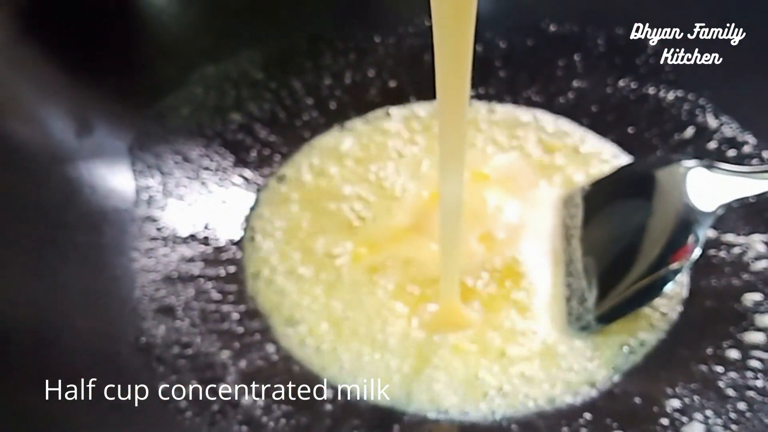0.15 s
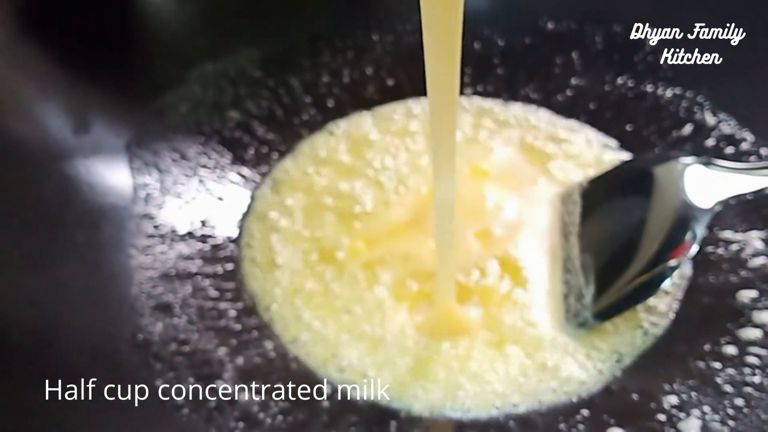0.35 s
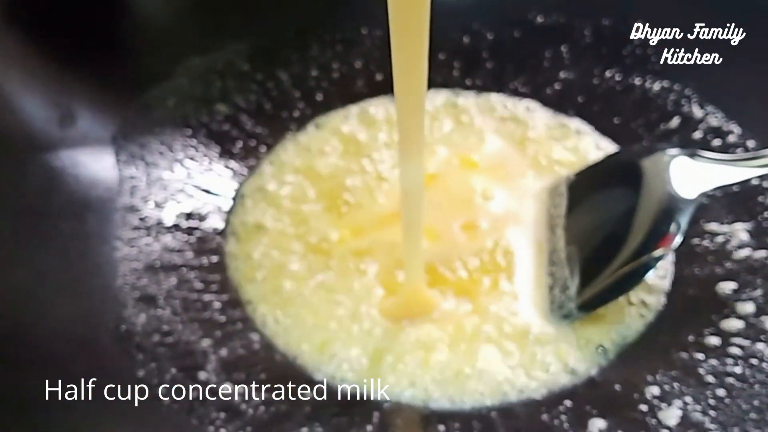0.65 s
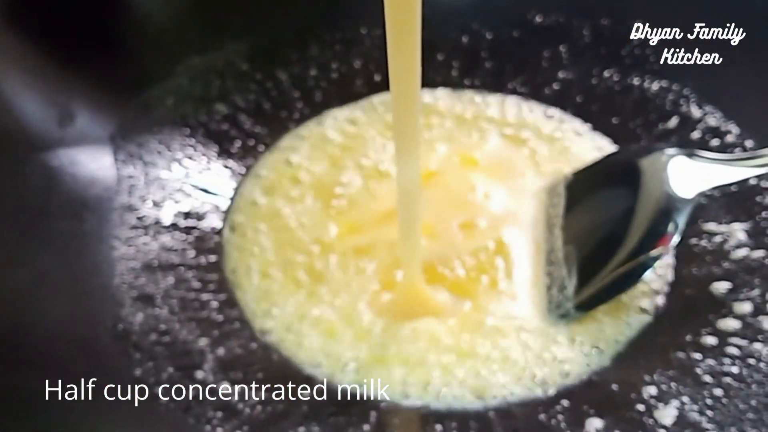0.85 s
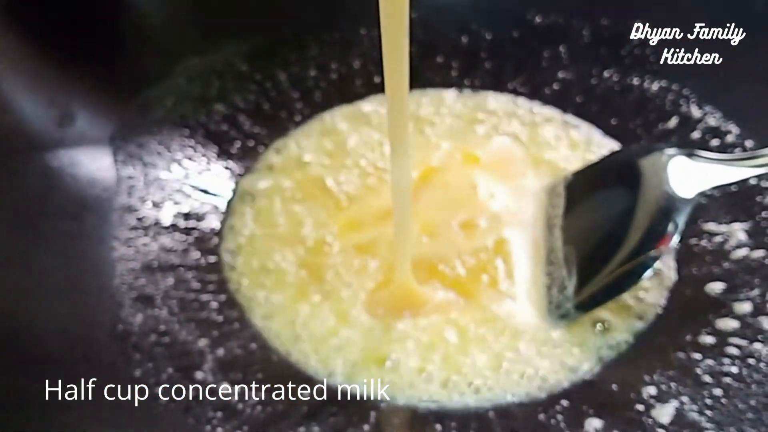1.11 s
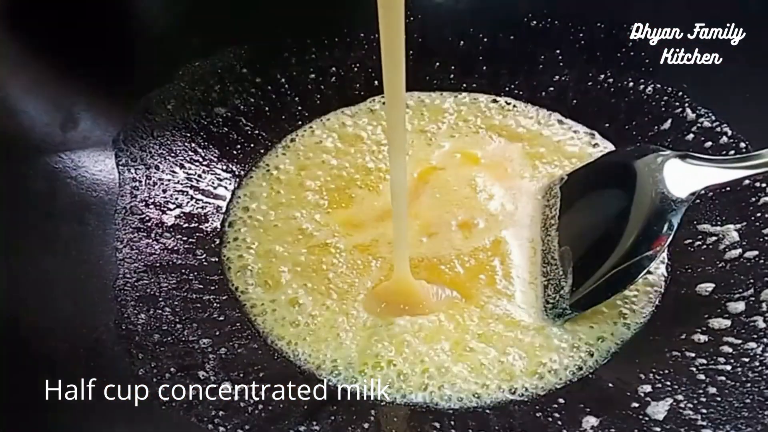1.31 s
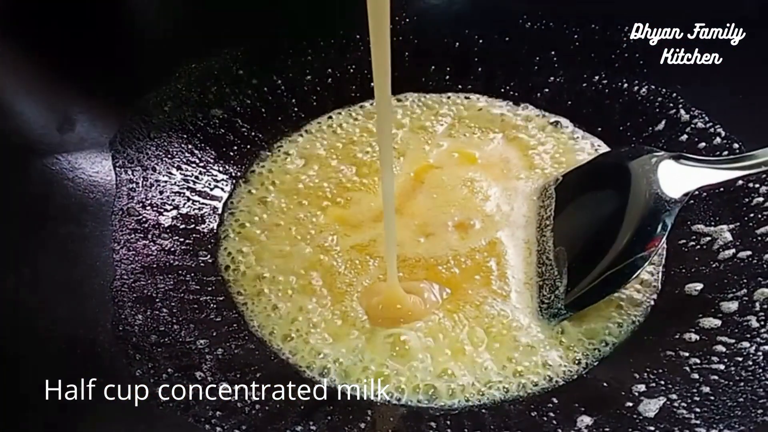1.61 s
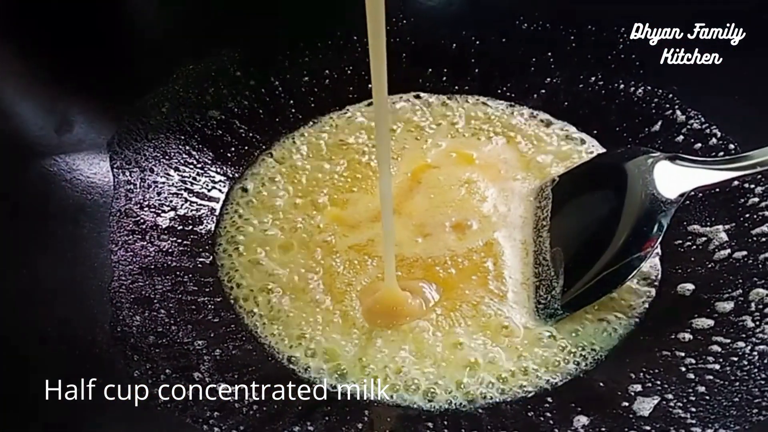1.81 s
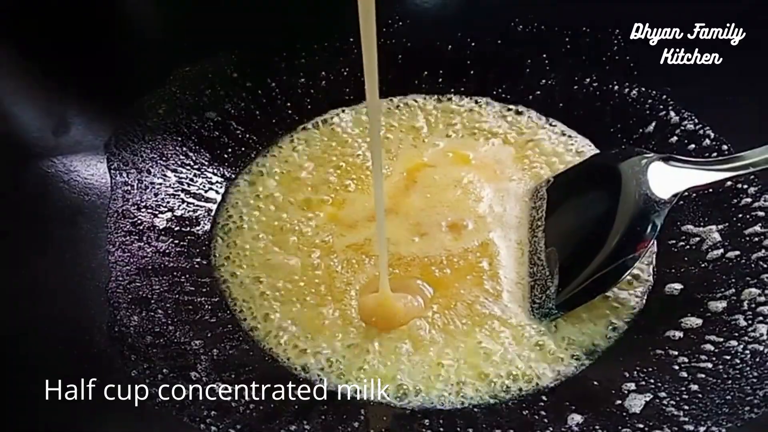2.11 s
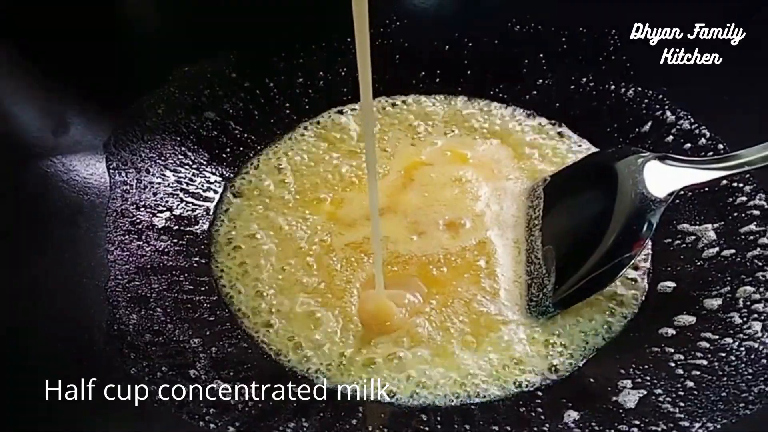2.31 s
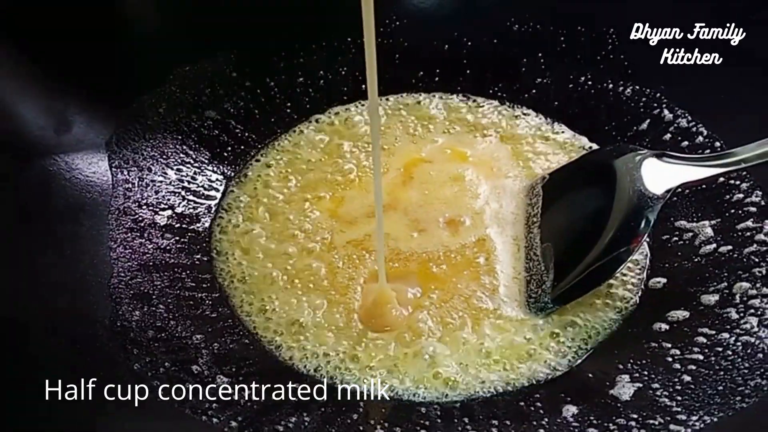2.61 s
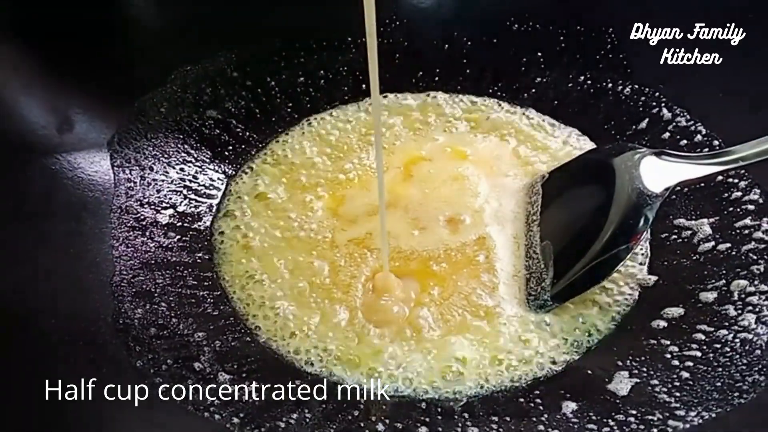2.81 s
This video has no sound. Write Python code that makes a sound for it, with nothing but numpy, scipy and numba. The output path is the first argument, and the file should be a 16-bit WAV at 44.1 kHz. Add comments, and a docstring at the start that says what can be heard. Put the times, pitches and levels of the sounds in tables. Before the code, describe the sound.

Butter sizzles and foams in a hot pan, close up in a small kitchen. It begins softer, with the fizz brightening after 0.3 s. Sharp spits snap on the left, clustering around 0.7-1.2 s, 1.65-1.7 s and 2.5 s. Foam sputters in short flurries over steady simmering; small bubbles plop near 0.7, 1.6 and 2.3-2.6 s. Two faint dull bumps come around 0.5 s, above a very quiet low bed.

```python
"""Butter foams in a hot pan close by, in a small kitchen: thousands of short random tones are its bubbles.
Tiny steam bubbles fizz and droplets spit on the left, while foam sputters steadily and in flurries.
Larger bubbles simmer below, and the largest plop, each as a tone that swells and dies away.
Faint, patchy low tones and soft hiss, a few clearer low tones and two soft bumps lie underneath."""
import sys
import numpy as np
from scipy import signal
from scipy.fft import rfft, irfft
from scipy.io import wavfile
from scipy.ndimage import uniform_filter1d
from numba import njit

SR = 44100
rng = np.random.default_rng(int(sys.argv[2]) if len(sys.argv) > 2 else 0)


def transcribe(u):
    """Save the signal u as a 16-bit wav file named by the first command-line argument.

    u: samples, shape (n,) or (channels, n), limited to [-1, 1]; the rate is SR.
    q: integer samples, one column per channel.
    """
    v = np.clip(np.atleast_2d(u).T, -1, 1)
    q = np.round(v * 32767).astype(np.int16)
    wavfile.write(sys.argv[1], SR, q)


N = 130095
TIME_S = np.arange(N) / SR


def undb(db):
    """Turn decibels into a plain gain."""
    return 10 ** (np.asarray(db) / 20)


def unit(x):
    """Scale to an average strength (rms) of 1."""
    return x / np.sqrt(np.mean(x ** 2))


def curve(rows):
    """Draw a gain over time through (time [s], level [dB]) rows."""
    return undb(np.interp(TIME_S, *np.array(rows).T))


def walk(rate_hz):
    """Wander slowly at random, with a spread near 1: held random steps, smoothed twice."""
    step = max(int(SR / rate_hz), 2)
    held = np.repeat(rng.standard_normal(N // step + 1), step)
    smooth = uniform_filter1d(uniform_filter1d(held, step), step)
    return 1.35 * smooth[:N]


def colour(x, rows):
    """Make each pitch range louder or softer by (pitch [Hz], left [dB], right [dB]) rows."""
    hz, left, right = np.array(rows).T
    log_hz = np.log(np.fft.rfftfreq(2 * N, 1 / SR) + 1)
    gains = undb([np.interp(log_hz, np.log(hz), side) for side in (left, right)])
    return irfft(rfft(x, 2 * N) * gains)[:, :N]


@njit
def bubbles(times, sizes, pitches, rings):
    """Each bubble is a short tone whose envelope swells to its size in its ring time and dies away."""
    out = np.zeros(N)
    for k in range(len(times)):
        first = max(int(times[k] * SR) + 1, 0)
        last = min(int((times[k] + 9 * rings[k]) * SR), N)
        for i in range(first, last):
            age = i / SR - times[k]
            envelope = age / rings[k] * np.exp(1 - age / rings[k])
            out[i] += sizes[k] * envelope * np.sin(2 * np.pi * pitches[k] * age)
    return out


def pops(rows, ring_s):
    """Play single short tones from (time [s], level [dB], pitch [Hz]) rows."""
    times, db, hz = np.array(rows, float).T.copy()
    return bubbles(times, undb(db), hz, np.full(len(hz), ring_s))


NEAR_DECAY_S, ROOM_T60_S, ROOM_LATE_DB = 0.012, 0.3, -16.5  # quick reflections; room tail


def kitchen(x, room_db):
    """Direct sound plus quick reflections from pan and hob and a short room tail, different at each ear."""
    t = np.arange(SR // 3) / SR
    near = np.exp(-t / NEAR_DECAY_S)
    late = undb(ROOM_LATE_DB - 60 * t / ROOM_T60_S)
    shape = (near + late) * (1 - np.exp(-t * 1000))  # eases in over about 1 ms
    response = rng.standard_normal((2, len(t))) * shape / np.sqrt(np.sum(shape ** 2))
    return x + undb(room_db) * signal.fftconvolve(x[None], response, axes=1)[:, :N]


BIGGEST = 5.32  # largest random tone, as a multiple of the spread in dB


def swarm(per_s, spread_db, ring_s, low_hz, high_hz, room_db, width_s=0, count=5):
    """Random short tones, many small and a few large, from several spots that differ in lag between ears."""
    out = 0
    draws = rng.random((int(per_s * N / SR / count), count, 4)).transpose(1, 2, 0)
    for (when, size, pitch, ring), place in zip(draws, np.linspace(-1, 1, count)):
        sizes = undb(spread_db * np.minimum(-np.log(1 - size), BIGGEST))
        pitches = low_hz + (high_hz - low_hz) * pitch
        rings = ring_s * 2 ** (ring - .5)  # shorter or longer by a factor of up to 1.41
        left, right = kitchen(bubbles(when * N / SR, sizes, pitches, rings), room_db)
        out = out + np.array([left, np.roll(right, round(place * width_s * SR))])
    return out


# strength of the fine fizz, before FIZZ_DB: (time [s], level [dB])
FIZZ_STRENGTH = [(0, -51.5), (.09, -50.5), (.16, -51.5), (.29, -54), (.34, -41), (.42, -47.5), (.52, -44),
                 (.68, -44.5), (.745, -45), (.79, -42), (1.1, -39.5), (1.17, -40.5), (1.22, -41),
                 (1.44, -44.5), (1.52, -39), (1.63, -43.5), (1.69, -40), (1.78, -39.5), (2.8, -40.5),
                 (2.95, -42.5)]
# colour of the fizz: (pitch [Hz], left [dB], right [dB])
FIZZ_TONE = [(1010, -18, -36), (3540, -6.5, -31), (4800, -8.5, -23), (5900, -1, -15.5), (7600, -14.5, -1),
             (8900, -14.5, -12.5), (10740, -0.5, -10.5), (13200, -0.5, -10), (15200, 3, -19)]
FIZZ_PER_S, FIZZ_SPREAD_DB, FIZZ_RING_S = 6000, 3.9, 0.00016
FIZZ_DB, FIZZ_ROOM_DB, FIZZ_WIDTH_S = 7, -2, .00005  # width: largest lag between the ears
SPLATTER_DB, SPLATTER_RISE_S, SPLATTER_FALL_S = -14, 0.0009, 0.01  # level is relative to the spit's row
RIGHT_FOLLOWS = 0.58  # share of the fizz's swings in dB that reaches the far, right ear


def fizz():
    """Tiny steam bubbles crackle in uneven waves; every spit throws a brief spray of them."""
    power = (curve(FIZZ_STRENGTH) * undb(FIZZ_DB + 1.93 * walk(70))) ** 2
    for start, db, _ in SPIT_EVENTS:
        rise, fall = (TIME_S - start) / SPLATTER_RISE_S, (start - TIME_S) / SPLATTER_FALL_S
        splatter = undb(db + SPLATTER_DB) * np.exp(np.minimum(rise, fall))
        power = power + splatter ** 2
    middle = np.median(power)
    right_power = middle * (power / middle) ** RIGHT_FOLLOWS
    grains = swarm(FIZZ_PER_S, FIZZ_SPREAD_DB, FIZZ_RING_S, 2810, 16450, FIZZ_ROOM_DB, FIZZ_WIDTH_S)
    return unit(colour(grains, FIZZ_TONE)) * np.sqrt([power, right_power])


# strength of the simmering, before SIMMER_DB: (time [s], level [dB])
SIMMER_STRENGTH = [(0, -52), (.08, -45.5), (.45, -48), (.6, -43.5), (.67, -47.5), (.77, -44), (.92, -49),
                   (1.0, -44), (1.23, -45), (1.44, -50.5), (1.51, -43), (1.56, -47), (1.69, -45),
                   (1.8, -45.5), (2.25, -45.5), (2.31, -44), (2.77, -42.5), (2.95, -46)]
# colour of the simmer: (pitch [Hz], left [dB], right [dB])
SIMMER_TONE = [(800, -67, -63), (1240, -34, -27), (1542, -8, -10.5), (1720, -3.5, -14), (2460, -0.5, -0.5),
               (3240, -1, 2.5), (3720, -6.5, -3.5), (4790, -3.5, -2), (7060, -21, -35), (12000, -35, -35)]
SIMMER_PER_S, SIMMER_SPREAD_DB, SIMMER_RING_S = 4500, 3.1, 0.00053
SIMMER_DB, SIMMER_ROOM_DB, SIMMER_WIDTH_S = 3.5, 4.5, .0003


def simmer():
    """Larger bubbles ring lower and longer."""
    grains = swarm(SIMMER_PER_S, SIMMER_SPREAD_DB, SIMMER_RING_S, 1284, 6060, SIMMER_ROOM_DB, SIMMER_WIDTH_S)
    strength = curve(SIMMER_STRENGTH) * undb(SIMMER_DB + 1.48 * walk(45.32))
    return unit(colour(grains, SIMMER_TONE)) * strength


# strength of the steady sputter under the flurries: (time [s], level [dB])
SPUTTER_STRENGTH = [(0, -40.5), (.1, -47), (.2, -44.5), (.55, -38.5), (.7, -38.5), (1.0, -40), (1.35, -38),
                    (1.41, -44), (1.5, -42), (1.63, -45), (1.72, -40.5), (2.12, -42), (2.21, -44),
                    (2.4, -40.5), (2.82, -40.5), (2.9, -39.5), (2.95, -37.5)]
# flurries of bursting foam, before FLURRY_DB: (time [s], length [s], level [dB])
FOAM_FLURRIES = [(0.081, 0.04, -35), (0.515, 0.014, -25.5), (0.59, 0.022, -31.5), (0.75, 0.02, -35),
                 (0.852, 0.011, -32), (0.903, 0.029, -28), (1.083, 0.047, -33.5), (1.206, 0.037, -31),
                 (1.285, 0.042, -31), (1.522, .025, -31), (1.596, 0.014, -28.5), (1.677, 0.021, -29),
                 (1.711, 0.025, -27.5), (1.765, 0.013, -30.5), (1.864, 0.025, -30.5), (1.905, 0.015, -27.5),
                 (1.95, 0.029, -32), (2.085, 0.03, -27), (2.152, 0.033, -31.5), (2.362, 0.049, -32),
                 (2.48, 0.064, -30.5), (2.63, 0.031, -36.5), (2.788, 0.039, -31.5)]
# colour of the sputter: (pitch [Hz], left [dB], right [dB])
SPUTTER_TONE = [(2890, -32, -16), (5560, -9, -16.5), (6660, -7.5, -8.5), (6900, -6, -6), (8000, -4, -4.5),
                (8700, -10.5, -7), (9090, -11.5, -10.5), (13900, -22.5, -42)]
SPUTTER_PER_S, SPUTTER_SPREAD_DB, SPUTTER_RING_S, SPUTTER_ROOM_DB = 4000, 2.72, 0.00035, -4
FLURRY_ATTACK_S, FLURRY_RELEASE_S, FLURRY_DB = 0.011, 0.0035, -6


def sputter():
    """Foam bursts steadily and in flurries that rise, hold and die away."""
    power = (curve(SPUTTER_STRENGTH) * undb(2.74 * walk(44.81))) ** 2
    for start, length, db in FOAM_FLURRIES:
        rise = np.clip((TIME_S - start) / FLURRY_ATTACK_S + .5, 0, 1)  # half risen at its start time
        fall = np.exp(-np.maximum(TIME_S - start - length, 0) / FLURRY_RELEASE_S)
        power = power + (undb(db + FLURRY_DB) * rise * fall) ** 2
    grains = swarm(SPUTTER_PER_S, SPUTTER_SPREAD_DB, SPUTTER_RING_S, 4510, 11170, SPUTTER_ROOM_DB)
    return unit(colour(grains, SPUTTER_TONE)) * np.sqrt(power)


# ups and downs of the low bed, before LOW_BED_DB: (time [s], level [dB])
LOW_BED_STRENGTH = [(0, 0), (.4, 0.5), (.62, 0), (.86, -11.5), (1.03, -2.5), (1.11, -16.5), (1.46, 1),
                    (1.56, -8.5), (1.83, -0.5), (1.93, -6.5), (2.3, -2), (2.52, -4.5)]
# colour of the low bed: (pitch [Hz], left [dB], right [dB])
LOW_BED_TONE = [(40, -24.5, -12), (172, -2, 3), (700, -5.5, -3), (1470, 3, -3), (3970, -48, -43)]
# short soft low tones, before the room is added: (time [s], level [dB], pitch [Hz])
LOW_TONES = [(.36, -58, 623), (1.013, -47, 1045), (1.033, -60, 702), (1.04, -58, 158), (2.163, -57.5, 675),
             (2.255, -55, 334), (2.37, -56.5, 353), (2.397, -50, 916)]
LOW_BED_PER_S, LOW_BED_SPREAD_DB, LOW_BED_RING_S = 120, 2.2, 0.0062
LOW_BED_DB, LOW_BED_ROOM_DB, LOW_BED_HISS_DB = -61, 1, -9  # hiss is relative to the random tones
LOW_TONE_RING_S = 0.008


def low_bed():
    """A faint, patchy bed of random low tones and soft hiss, with a few clearer short soft low tones."""
    grains = swarm(LOW_BED_PER_S, LOW_BED_SPREAD_DB, LOW_BED_RING_S, 30.0, 1503.6, LOW_BED_ROOM_DB)
    hiss = unit(colour(rng.standard_normal((2, N)), LOW_BED_TONE))
    bed = unit(colour(grains, LOW_BED_TONE)) + undb(LOW_BED_HISS_DB) * hiss
    strength = curve(LOW_BED_STRENGTH) * undb(LOW_BED_DB + 2 * walk(29.85))
    clear_tones = kitchen(pops(LOW_TONES, LOW_TONE_RING_S), room_db=0)
    return bed * strength + clear_tones


# sharp spits of fat, before filter, room and SPIT_DB: (time [s], level [dB], pitch [Hz])
SPIT_EVENTS = [(0.296, -21.5, 7150), (0.5225, -20.5, 7060), (0.607, -21, 14200), (0.6948, -13.5, 12800),
               (.7620, -11.5, 10300), (.7789, -17.5, 13900), (0.8613, -14, 11300), (0.987, -23, 13900),
               (1.0056, -15, 15000), (1.0432, -16, 12800), (1.0527, -21, 12400), (1.1158, -19, 14200),
               (1.1838, -17, 14200), (1.2067, -20.5, 10400), (1.2285, -16, 13300), (1.4882, -16, 12300),
               (1.642, -16, 13300), (1.6739, -9, 14500), (1.6820, -13, 6700), (1.6888, -24, 11800),
               (1.7010, -17, 13900), (1.8755, -22, 7300), (2.1801, -15, 14600), (2.4224, -15, 12300),
               (2.4825, -19.5, 5900), (2.4985, -13, 14200), (2.5012, -12, 14600), (2.6576, -16, 14400)]
SPIT_RING_S, SPIT_RIGHT_DB, SPIT_DB, SPIT_ROOM_DB = 0.00013, -18, 4, -15
SNAP_DB, SNAP_HZ, SNAP_RING_S = -8, 8000, .00003  # the crack that opens each spit


def spits():
    """Droplets of water explode in the fat, close on the left: a broad snap and a very short ring."""
    snaps = pops([(start, db + SNAP_DB, SNAP_HZ) for start, db, _ in SPIT_EVENTS], SNAP_RING_S)
    rings = pops(SPIT_EVENTS, SPIT_RING_S)
    low_cut = signal.butter(4, 3500, "high", fs=SR, output="sos")
    cracks = signal.sosfilt(low_cut, snaps + rings)
    return kitchen(cracks, SPIT_ROOM_DB) * undb(SPIT_DB) * undb([[0], [SPIT_RIGHT_DB]])


# soft low bumps, before the room is added: (time [s], level [dB], pitch [Hz])
SOFT_BUMPS = [(.501, -40.5, 105), (.564, -46, 135)]
BUMP_RING_S, BUMP_RIGHT_DB = 0.0029, -40


def bumps():
    """Two soft, dull bumps on the left, each a short low tone."""
    return kitchen(pops(SOFT_BUMPS, BUMP_RING_S), room_db=1) * undb([[0], [BUMP_RIGHT_DB]])


# large bubbles that plop, before filter, room and PLOP_DB: (time [s], level [dB], pitch [Hz])
LARGE_PLOPS = [(.735, -19, 2880), (1.206, -23.5, 2600), (1.597, -18.5, 2950), (1.641, -15, 2350),
               (1.644, -21.5, 1580), (2.303, -22, 3620), (2.42, -19.5, 2680), (2.521, -20.5, 4100),
               (2.555, -19.5, 2930), (2.912, -21.5, 3330)]
PLOP_RING_S, PLOP_DB, PLOP_ROOM_DB, PLOP_LOW_HZ = 0.00071, -12, 3.5, 1350


def plops():
    """The largest bubbles burst and ring in the pan, without any bass."""
    low_cut = signal.butter(6, PLOP_LOW_HZ, "high", fs=SR, output="sos")
    thin = signal.sosfilt(low_cut, pops(LARGE_PLOPS, PLOP_RING_S))
    return kitchen(thin, PLOP_ROOM_DB) * undb(PLOP_DB)


def scene():
    """Add up all the sounds."""
    return fizz() + simmer() + sputter() + low_bed() + spits() + bumps() + plops()


TOP_HZ = 15550


def record(dry):
    """The recorder cuts the top steeply."""
    top_cut = signal.ellip(8, .1, 50, TOP_HZ, fs=SR, output="sos")
    return signal.sosfiltfilt(top_cut, dry)


dry = scene()
out = record(dry)
transcribe(out)
```